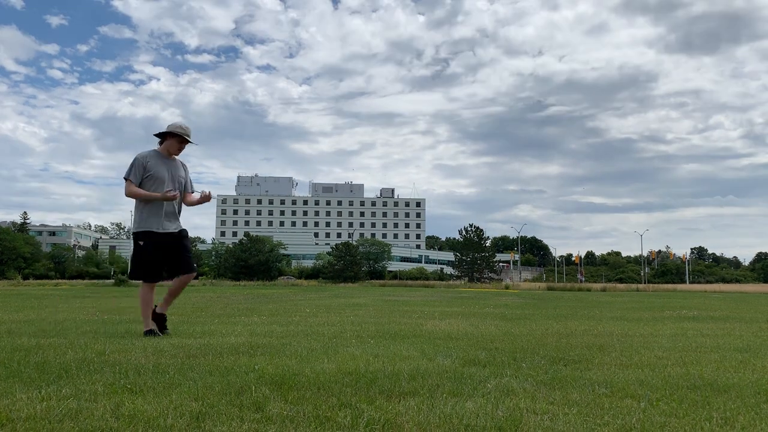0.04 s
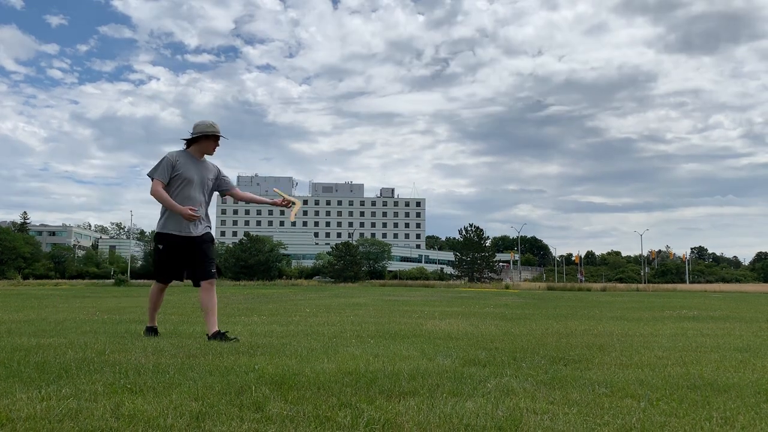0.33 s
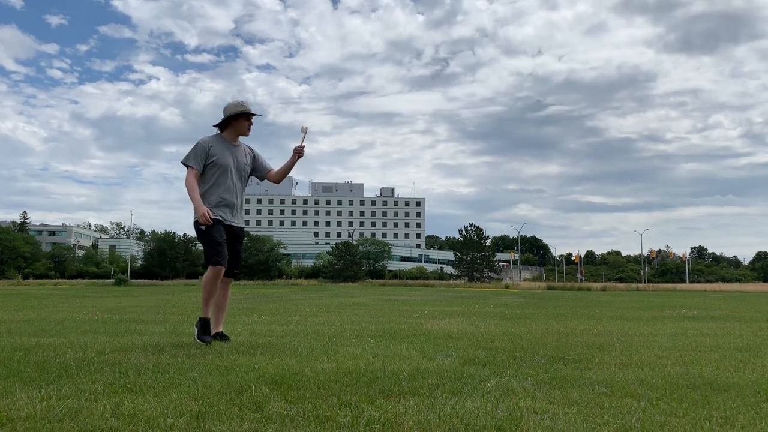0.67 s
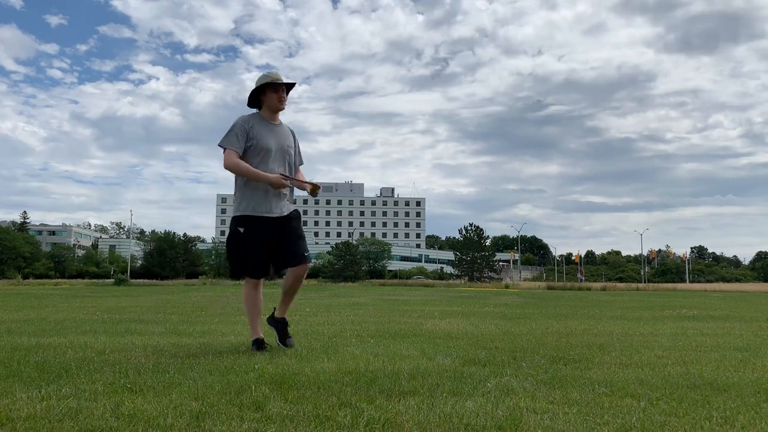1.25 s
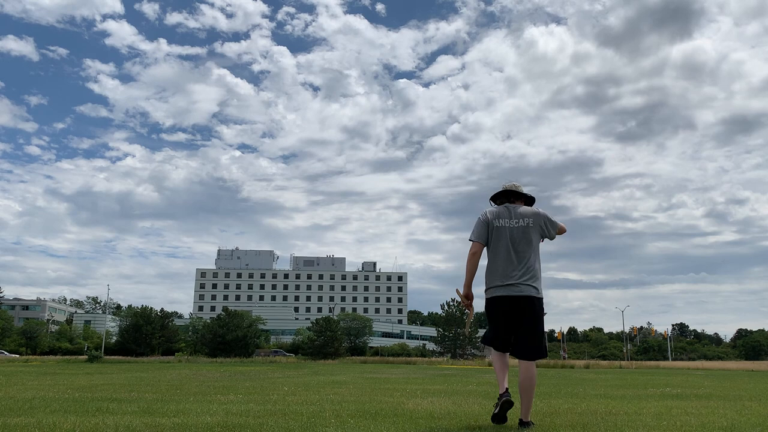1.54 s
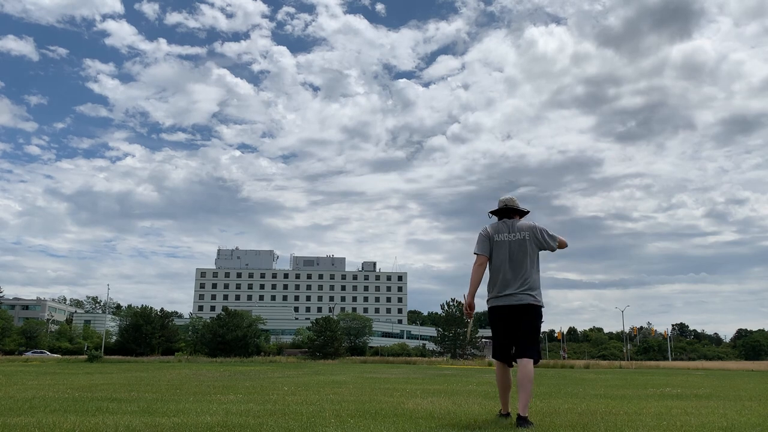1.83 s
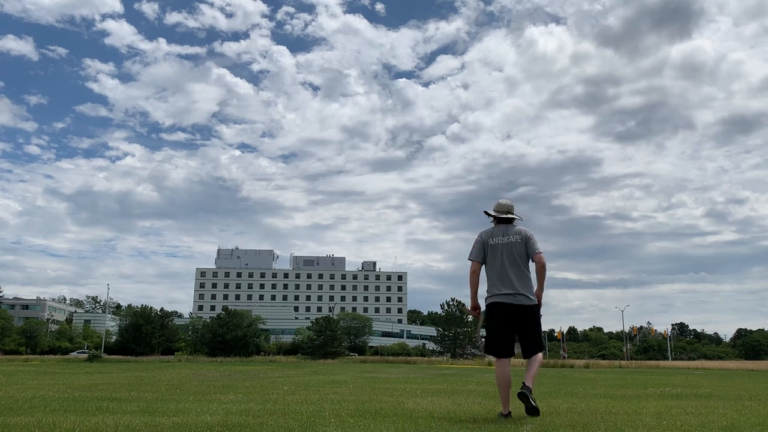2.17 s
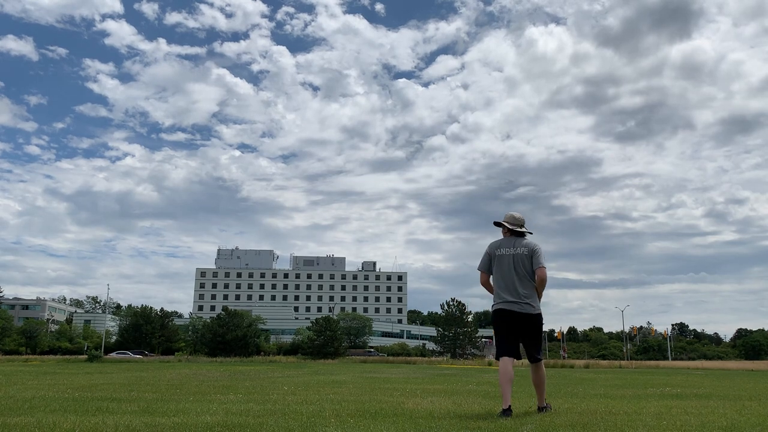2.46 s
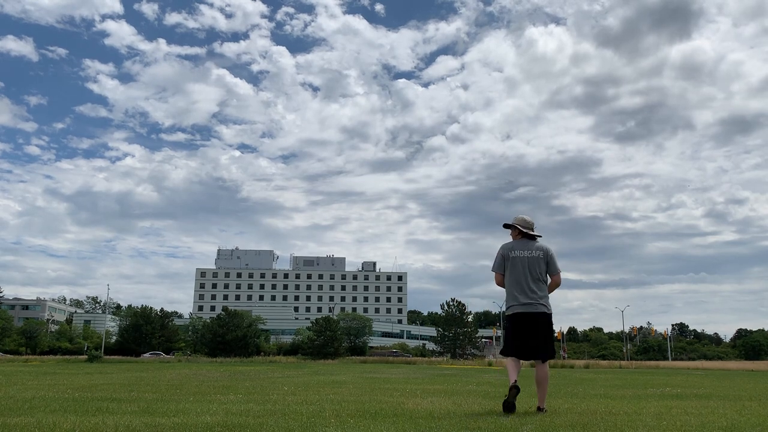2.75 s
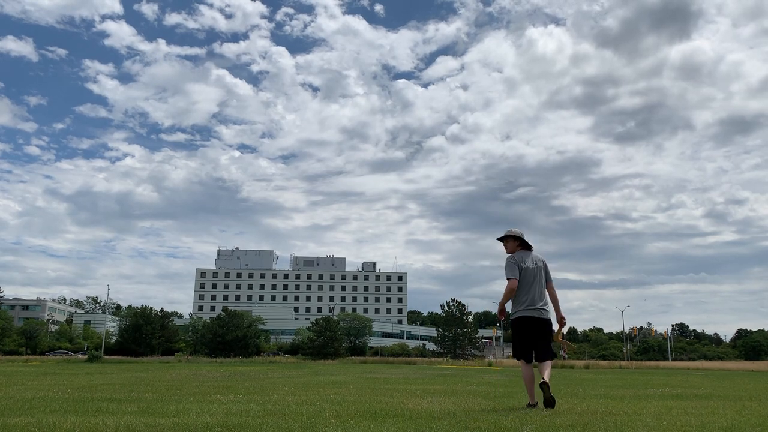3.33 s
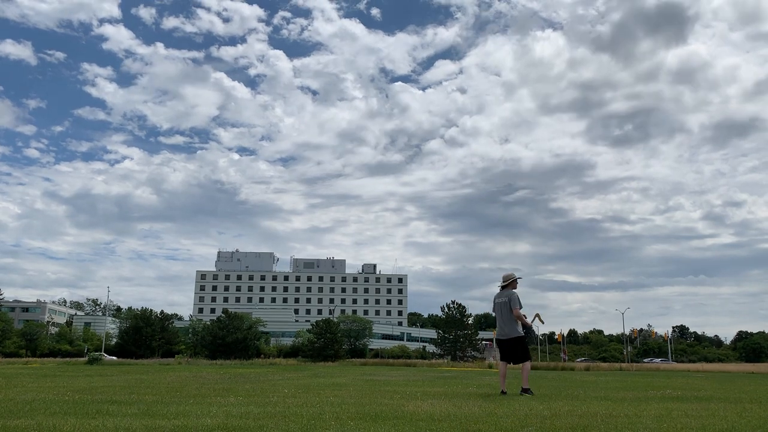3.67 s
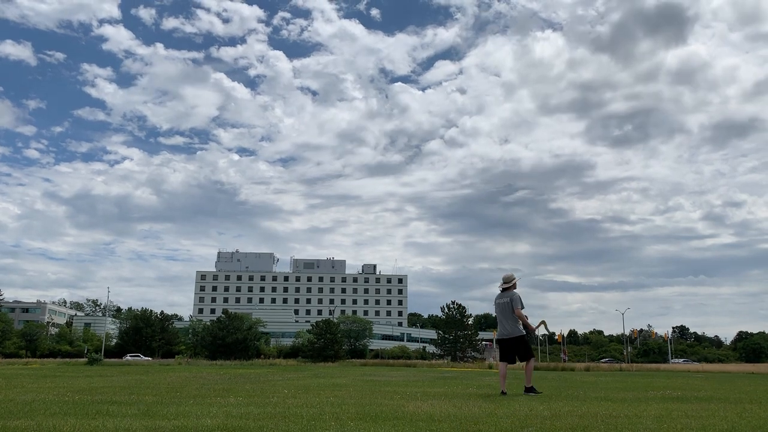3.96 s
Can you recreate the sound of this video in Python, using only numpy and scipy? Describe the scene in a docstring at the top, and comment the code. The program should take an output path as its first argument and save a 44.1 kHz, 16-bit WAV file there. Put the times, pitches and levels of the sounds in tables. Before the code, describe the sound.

Quick, repeated rising bird chirps outdoors, with rumbling wind and soft steps through grass.

```python
"""A mown field at the edge of a town, on one microphone. Wind rumbles over far traffic from the start;
a bird gives falling chips, shoes swish through the grass, and thin high notes come from farther off.
At 1.4 s the background shifts abruptly: a bird in the trees repeats a rising whistle seven times a second
over blurred birdsong and a distant engine. All three stop at 3.5 s as the background shifts again,
and one long whistle slurs downward."""
import sys
import numpy as np
from scipy import signal
from scipy.fft import rfft, irfft
from scipy.io import wavfile

SR = 44100
rng = np.random.default_rng(int(sys.argv[2]) if len(sys.argv) > 2 else 0)


def persist_wave(psi):
    """Save psi, clipped to +-1, as 16-bit WAV."""
    counts = np.round(np.clip(psi, -1, 1) * 32767).astype(np.int16)
    wavfile.write(sys.argv[1], SR, np.atleast_2d(counts).T)


N = 176400
CHANGES_S = (1.372, 3.535)  # where the three stretches of background meet


def undb(db):
    """Decibels to gain."""
    return 10 ** (np.asarray(db) / 20)


def clock():
    """Time of every sample in seconds."""
    return np.arange(N) / SR


def ramp(x):
    """Smooth step from 0 to 1."""
    return np.sin(np.pi / 2 * np.clip(x, 0, 1)) ** 2


def walk(rate_hz):
    """Smooth random motion with spread 1."""
    hz = np.arange(N // 2 + 1) * SR / N
    motion = irfft(rfft(rng.standard_normal(N)) * np.exp(-.5 * (hz / rate_hz) ** 2), N)
    return motion / np.sqrt(np.mean(motion ** 2))


def colour(x, points):
    """Give x a spectrum of (Hz, dB) points, at rms 1."""
    hz, db = np.array(points).T
    bins_hz = np.maximum(np.arange(N // 2 + 1) * SR / N, 1)
    gain = undb(np.interp(np.log(bins_hz), np.log(hz), db))
    low_cut = np.minimum(bins_hz / hz[0], 1) ** 2
    shaped = irfft(rfft(x) * gain * low_cut, N)
    return shaped / shaped.std()


def whistle(hz):
    """A pure tone of rms 1 that follows a pitch."""
    return np.sqrt(2) * np.sin(2 * np.pi * np.cumsum(hz) / SR)


def trees(x, wet_db, t60_s, onset_s):
    """Add the diffuse scatter from branches and the tree line."""
    t = clock()[:SR]
    tail = rng.standard_normal(SR) * ramp(t / onset_s) * np.exp(-np.log(1000) * t / t60_s)
    return x + undb(wet_db) * signal.fftconvolve(x, tail / np.linalg.norm(tail))[:N]


def stretches():
    """Gates for the first, middle and last stretch, joined by 5 ms crossfades."""
    first, second = (ramp((clock() - s) / .0051 + .5) for s in CHANGES_S)
    return 1 - first, first - second, second


def background(gates):
    """Far traffic and leaves, with the wind buffeting the low end."""
    # The air's spectrum in each stretch. Each row: frequency in Hz, relative level in dB.
    air_first = [(22, -36), (35, -10), (55, 4), (80, 1.5), (125, -3.5), (175, -12.5), (235, -10.5),
                 (310, -23.5), (365, -20), (450, -25), (620, -25.5), (900, -25), (1500, -28.5),
                 (2400, -35.5), (3400, -43), (5000, -56), (7000, -57.5), (15500, -57)]
    air_middle = [(22, -28), (35, -10), (55, 0.5), (95, 1.5), (140, -4), (190, -12), (260, -18.5),
                  (340, -23.5), (480, -30.5), (650, -29.5), (1000, -26.5), (1600, -31), (2400, -37.5),
                  (3400, -43), (4500, -62), (5700, -63), (7200, -60.5), (9000, -57), (15500, -62.5)]
    air_last = [(20, -28), (35, -5.5), (55, 4), (100, 0), (150, -7), (240, -16.5), (340, -24.5),
                (550, -29.5), (950, -26.5), (1600, -31.5), (2400, -36), (3400, -46), (5000, -57),
                (7000, -63), (15500, -61.5)]
    # The level of each stretch in dB.
    air_db = (-45.5, -43, -44)
    # Strength of the wind rumble. Each row: time in seconds, gain in dB.
    wind = [(0, 2), (.3, -8.5), (.48, 5), (.7, -2.5), (1.0, -4.5), (1.35, -0.5), (1.85, 2.5), (2.1, -4),
            (2.55, 2.5), (3.0, -1), (3.33, 3), (3.44, 7), (3.701, 1), (4, 1.5)]
    air = sum(gate * undb(db) * colour(rng.standard_normal(N), spectrum)
              for gate, db, spectrum in zip(gates, air_db, (air_first, air_middle, air_last)))
    rumble = signal.sosfiltfilt(signal.butter(2, 102, fs=SR, output="sos"), air)  # below 102 Hz
    gust = undb(np.interp(clock(), *np.array(wind).T) + 2.5 * walk(22))
    return rumble * gust + (air - rumble) * undb(walk(7.3))


def chips():
    """A bird's quick downward flicks that flatten toward their end, blurred by the leaves."""
    # Each row: start in seconds, length in seconds, first pitch in Hz, last pitch in Hz, level in dB.
    calls = [(.001, .055, 4400, 3200, -71), (0.115, 0.064, 4250, 3180, -71),
             (2.062, 0.036, 3900, 3150, -76), (2.416, 0.07, 4920, 3394, -56),
             (2.554, .061, 4700, 3444, -59), (2.698, 0.055, 4300, 3410, -67),
             (3.26, 0.045, 5200, 3900, -76), (3.87, 0.024, 4500, 3820, -70)]
    bend, attack_s, release_s = 1.1, .022, .014
    song, waver = np.zeros(N), 1 + .01 * walk(300)
    for start, length, first_hz, last_hz, db in calls:
        age = clock() - start
        on = (age > 0) & (age < length)
        age = age[on]
        hz = first_hz + (last_hz - first_hz) * np.expm1(-bend * age / length) / np.expm1(-bend)
        envelope = ramp(age / attack_s) * ramp((length - age) / release_s)
        song[on] += undb(db) * envelope * whistle(hz * waver[on])
    near = trees(song * undb(1.5 * walk(70)), wet_db=-7, t60_s=.05, onset_s=.007)
    return trees(near, wet_db=-9.5, t60_s=.75, onset_s=.045)


def grass_ticks(per_s=5000, spread_db=2.4):
    """Grass blades tick at random moments and in uneven sizes."""
    sizes = undb(spread_db * np.minimum(rng.exponential(size=N), 4))
    return rng.standard_normal(N) * sizes * (rng.random(N) < per_s / SR)


def footsteps(gates):
    """Each stride brushes a swell of ticks from the grass, heard only within the stretch where it peaks."""
    # Each row: peak, rise and fall in seconds, level in dB, weight of the lower rustle in dB.
    swishes = [(.10, 0.11, .016, -82, 5.5), (.208, 0.076, 0.044, -61.5, -1.5),
               (.355, 0.052, 0.022, -71, -2), (.455, 0.023, .02, -83.5, 2), (.51, 0.018, 0.033, -68, -5.5),
               (.675, 0.04, 0.046, -78, -2), (.82, 0.096, 0.051, -67.5, -5.5),
               (.95, 0.061, 0.031, -67.5, -6), (1.089, 0.024, 0.013, -73, 4.5),
               (1.348, 0.073, 0.05, -62, 4), (1.405, .015, 0.031, -74.5, 5.5), (1.7, 0.11, .07, -82, 7.5),
               (1.87, .025, .025, -82, 0), (2.09, 0.032, .035, -80, 2.5),
               (2.355, 0.099, 0.075, -73.5, -3.5), (2.76, 0.046, 0.055, -77, 0),
               (2.98, 0.11, 0.11, -77, 0.5), (3.355, 0.049, 0.046, -79, 0)]
    # Blade tips, and the fuller rustle of a dragging shoe. Each row: frequency in Hz, relative level in dB.
    blades = [(2000, -21), (5500, -9.5), (7500, -28), (9000, -8), (11400, -5), (12600, 0), (14000, 1),
              (16000, -5)]
    rustle = [(700, -19), (2000, -6), (3500, 7.5), (5500, 5), (7800, 10), (8700, 14), (10000, 9.5),
              (12000, 5), (16000, -9)]
    tips, drag, t = np.zeros(N), np.zeros(N), clock()
    for peak, rise, fall, db, rustle_db in swishes:
        width = np.where(t < peak, rise, fall)
        gate = gates[np.searchsorted(CHANGES_S, peak)]
        swell = undb(db) * np.exp(-((t - peak) / width) ** 2) * gate
        tips += swell
        drag += swell * undb(rustle_db - 1.5)
    grass = tips * colour(grass_ticks(), blades) + drag * colour(grass_ticks(), rustle)
    return grass * undb(.97 * walk(70))


def stalks(fade_s=.0039):
    """Short crisp ticks as bent stalks spring back off a shoe."""
    # Each row: start in seconds, level in dB.
    flicks = [(.097, -69), (.508, -69), (.555, -68), (.62, -72), (.655, -69), (.692, -73), (.779, -70),
              (1.433, -67), (1.482, -71), (1.658, -71)]
    # A stalk's tick. Each row: frequency in Hz, relative level in dB.
    spectrum = [(1500, -20), (3500, -3), (6000, 5), (9000, 2), (16000, -10)]
    t = clock()
    envelope = sum(undb(db) * (t > start) * np.exp(-np.abs(t - start) / fade_s) for start, db in flicks)
    return envelope * colour(rng.standard_normal(N), spectrum)


def footfall():
    """One shoe lands softly on the turf with a dull puff of noise."""
    # Its peak in seconds, half length in seconds and level in dB.
    scuff = (0.953, 0.049, -58.5)
    # The turf's tone. Each row: frequency in Hz, relative level in dB.
    turf = [(300, -15), (600, 16), (950, 13), (1500, 1), (4000, -15), (9000, -40)]
    peak, half, db = scuff
    return undb(db) * np.exp(-((clock() - peak) / half) ** 2) * colour(rng.standard_normal(N), turf)


def thin_notes(edge_s=.042):
    """Small birds far from the microphone: thin whistles, one breaking into a falling buzz."""
    # Each row: start and length in seconds, first and last pitch in Hz, level in dB,
    # roughness as a share of the pitch.
    notes = [(0.962, 0.13, 2270, 2650, -74, .006), (1.365, 0.073, 6910, 6810, -72.5, .003),
             (1.508, .11, 8200, 7100, -82, .035), (1.56, 0.079, 6790, 6740, -70, 0.011),
             (1.65, .06, 6840, 6800, -75, 0.0092), (1.752, 0.15, 5750, 6500, -72.5, 0.038),
             (1.851, 0.083, 6500, 6320, -76, 0.068), (1.858, 0.11, 5660, 4140, -72, 0.12),
             (2.10, 0.061, 6830, 6800, -86, .003), (2.87, .25, 5100, 5030, -87, .05)]
    song, shake = np.zeros(N), walk(400)
    for start, length, first_hz, last_hz, db, rough in notes:
        age = clock() - start
        on = (age > 0) & (age < length)
        age = age[on]
        hz = first_hz + (last_hz - first_hz) * age / length
        envelope = ramp(age / edge_s) * ramp((length - age) / edge_s)
        song[on] += undb(db) * envelope * whistle(hz * (1 + rough * shake[on]))
    return trees(song * undb(1.4 * walk(90)), wet_db=-2, t60_s=.27, onset_s=.0099)


def trill():
    """A bird in the trees: each note sweeps up ever faster, then fades at the top; leaves roughen it."""
    # Each row: end of the sweep in seconds, top pitch in Hz, level in dB,
    # time constant of the climb in seconds, level of the held top against the sweep in dB.
    notes = [(1.408, 3170, -62, 0.026, -10), (1.556, 3120, -61.5, .035, -11),
             (1.702, 3060, -60.5, .037, -13), (1.85, 2940, -62, 0.03, -13), (1.994, 3024, -62, 0.028, -6.5),
             (2.139, 3113, -60.5, 0.024, -11.5), (2.283, 3216, -60, .024, -9),
             (2.427, 3224, -60.5, 0.024, -13), (2.571, 2910, -59, 0.028, -18),
             (2.721, 3143, -60.5, .029, -14), (2.868, 3030, -60.5, 0.023, -12),
             (3.017, 3090, -62, 0.028, -11), (3.163, 3265, -61, 0.024, -8), (3.306, 3210, -61.5, .025, -12),
             (3.454, 3140, -62.5, 0.029, -5.5)]
    base_hz, swell_db = 1700, 6.5
    sweep_s, attack_s, drop_s, fade_s = .078, .026, .003, .06
    song, waver = np.zeros(N), 1 + .018 * walk(200)
    for top_s, top_hz, db, bend_s, held_db in notes:
        past_top = clock() - top_s
        on = (past_top > -sweep_s) & (past_top < fade_s * 4)
        past_top = past_top[on]
        climb = np.exp(np.minimum(past_top, 0) / bend_s)
        hz = base_hz + (top_hz - base_hz) * climb
        swell = ramp((past_top + sweep_s) / attack_s) * undb(swell_db * (ramp(2 * climb) - 1))
        drop = undb(held_db * ramp(past_top / drop_s + .5))
        fade = np.exp(-np.maximum(past_top, 0) / fade_s)
        song[on] += undb(db) * swell * drop * fade * whistle(hz * waver[on])
    near = trees(song * undb(1.3 * walk(80)), wet_db=-2, t60_s=.11, onset_s=.012)
    return trees(near, wet_db=-4.5, t60_s=.4, onset_s=.012)


def chorus():
    """Birds so far off that their song blurs into a band that swells and ebbs."""
    # Each row: time in seconds, level in dB.
    levels = [(1.38, -82), (1.52, -73.5), (1.7, -79.5), (2.0, -75), (2.2, -79.5), (2.36, -75),
              (2.72, -79.5), (2.85, -85), (3.02, -80.5), (3.2, -77.5), (3.4, -76.5), (3.53, -83)]
    # The band of song. Each row: frequency in Hz, relative level in dB.
    band = [(2600, -33), (3500, 2.5), (4400, 1), (5100, -4), (5700, -19), (8000, -50)]
    swell = undb(np.interp(clock(), *np.array(levels).T) + 2 * walk(16))
    return swell * colour(rng.standard_normal(N), band)


def engine():
    """A far engine's drone and faint whine; each partial swells and wavers on the wind."""
    # Each row: pitch in Hz, level in dB, wander as a share of the pitch,
    # peak and half length of the swell in seconds.
    partials = [(112.9, -48, 0.015, 3.5, 6.2), (142.7, -52, 0.0186, 2.85, 0.83),
                (263.5, -62.5, 0.026, 2.36, 0.34), (365.8, -71.5, 0.00483, 2.98, 0.77),
                (1530, -75, 0.0016, 2.8, 1.3)]
    drone = np.zeros(N)
    for hz, db, wander, peak, half in partials:
        swell = undb(db + 2 * walk(3.6)) * np.exp(-((clock() - peak) / half) ** 2)
        drone += swell * whistle(hz * (1 + wander * walk(8.57)))
    return drone


def slur(echo_s=.036, echo_db=-9):
    """A bird's long, quavering, falling whistle that beats against its own echo."""
    # Each row: time in seconds, pitch in Hz, level in dB.
    contour = [(3.646, 4820, -84), (3.655, 4530, -70.5), (3.666, 4440, -79), (3.685, 4430, -78),
               (3.711, 4300, -88), (3.724, 3900, -75), (3.751, 3835, -70), (3.766, 3560, -81),
               (3.789, 3460, -66), (3.813, 3400, -66), (3.831, 3106, -65), (3.88, 3066, -68),
               (3.897, 3035, -59), (3.918, 2980, -59.5), (3.94, 2880, -68), (3.962, 2650, -62),
               (4.0, 2550, -70)]
    t = clock()
    times, hz, db = np.array(contour).T
    tone = whistle(np.interp(t, times, hz) * (1 + .01 * walk(220)))
    call = tone * undb(np.interp(t, times, db) + 1.5 * walk(60)) * (t > times[0])
    echo = undb(echo_db) * np.interp(t - echo_s, t, call)
    return trees(call + echo, wet_db=-4.5, t60_s=.26, onset_s=.012)


def scene():
    """The field in mono; trill, chorus and engine sound only in the middle stretch."""
    gates = stretches()
    middle = gates[1] * (trill() + chorus() + engine())
    birds = chips() + thin_notes() + slur()
    shoes = footsteps(gates) + stalks() + footfall()
    return (background(gates) + birds + shoes + middle)[None]


def record(dry, top_hz=15600):
    """The recorder cuts the highest treble steeply."""
    return signal.sosfilt(signal.ellip(10, .1, 70, top_hz, fs=SR, output="sos"), dry)


dry = scene()
out = record(dry)
persist_wave(out)
```